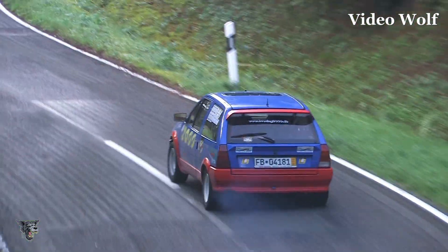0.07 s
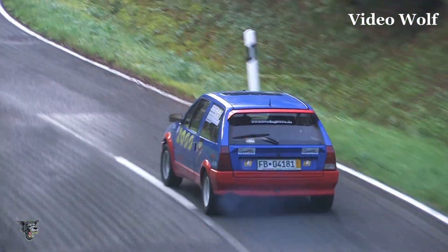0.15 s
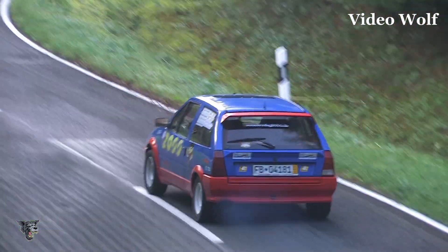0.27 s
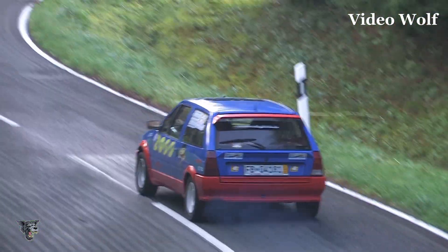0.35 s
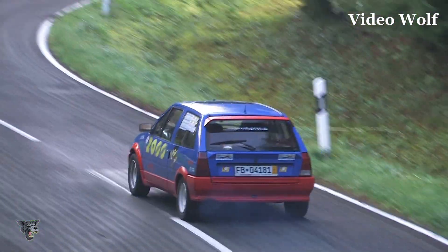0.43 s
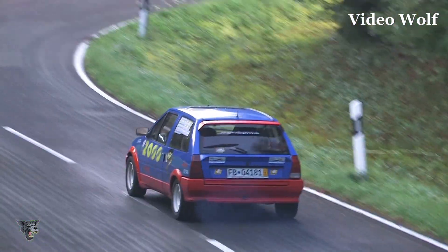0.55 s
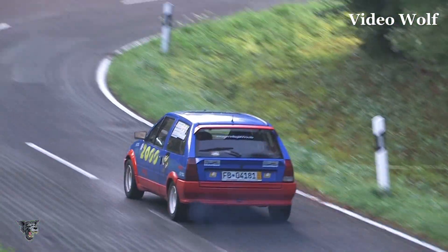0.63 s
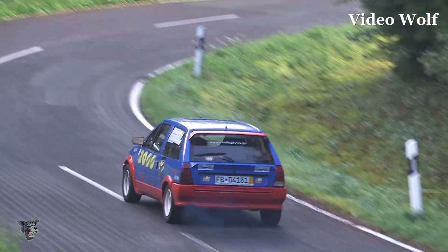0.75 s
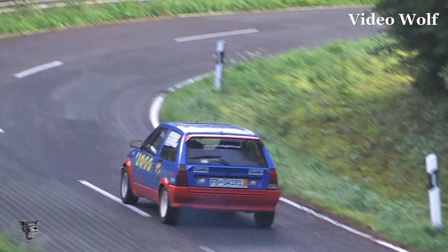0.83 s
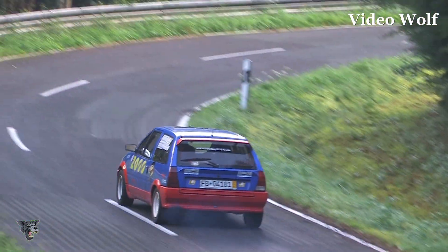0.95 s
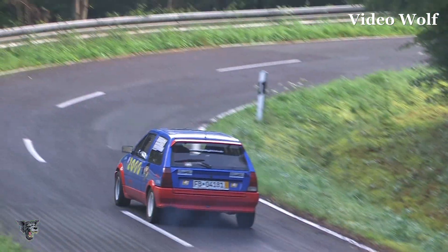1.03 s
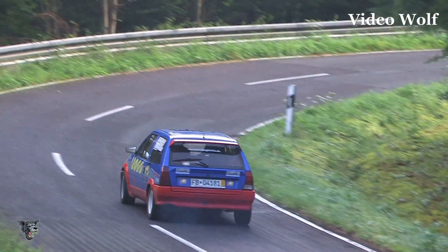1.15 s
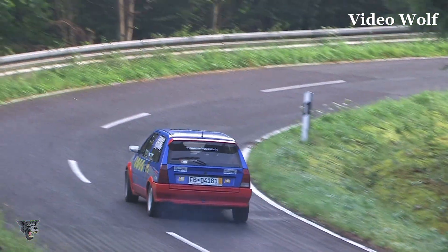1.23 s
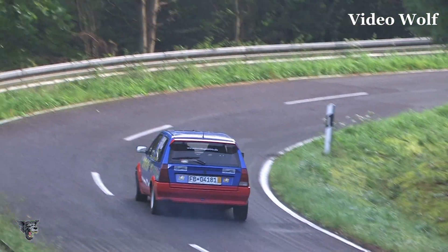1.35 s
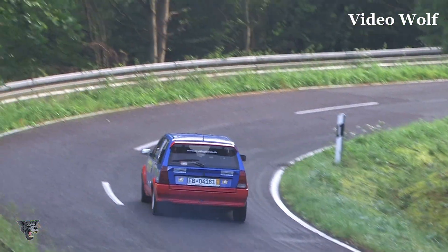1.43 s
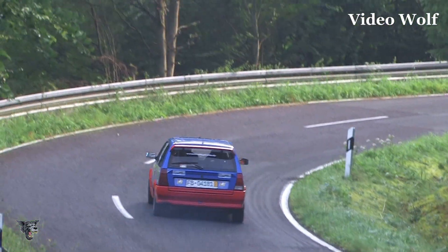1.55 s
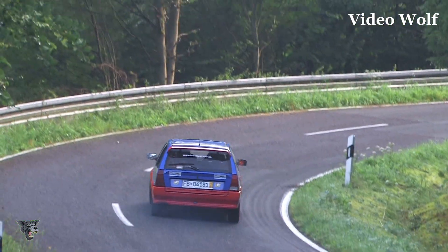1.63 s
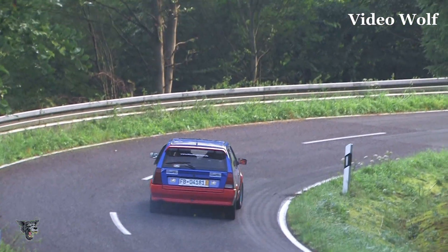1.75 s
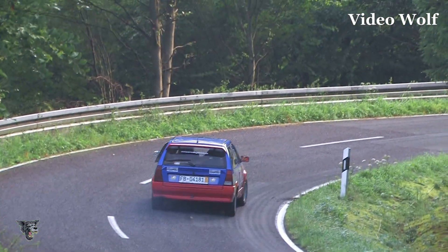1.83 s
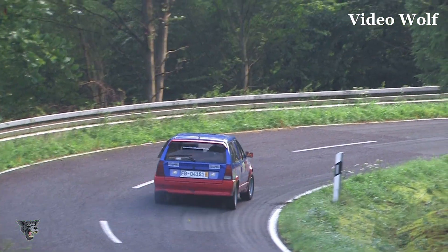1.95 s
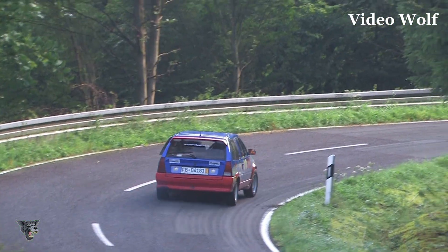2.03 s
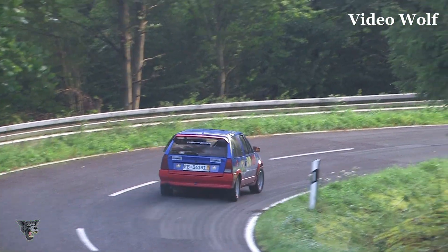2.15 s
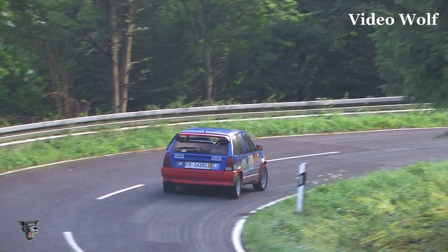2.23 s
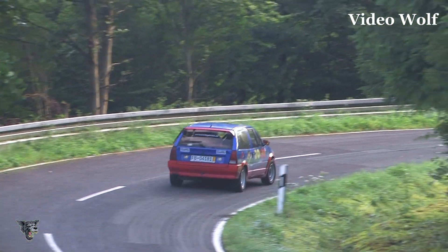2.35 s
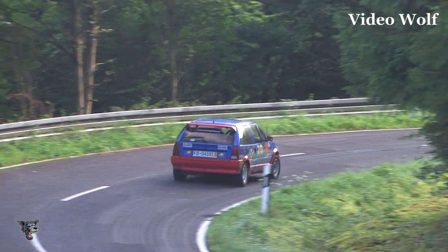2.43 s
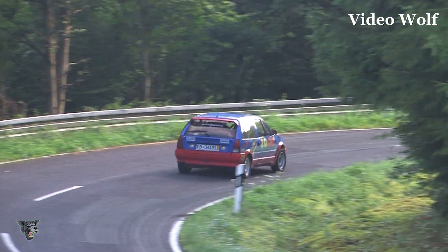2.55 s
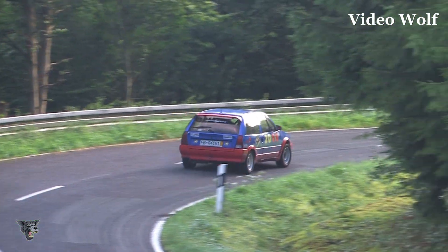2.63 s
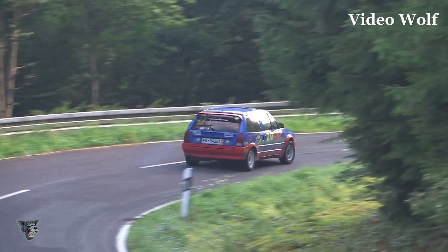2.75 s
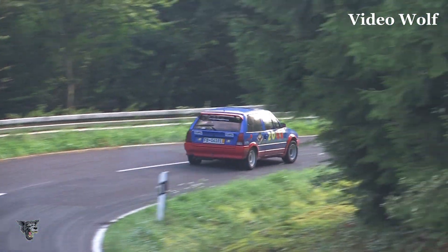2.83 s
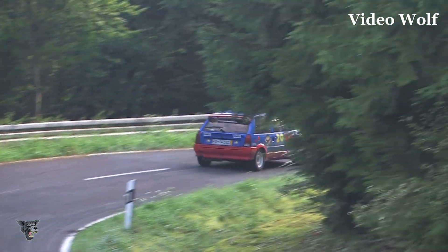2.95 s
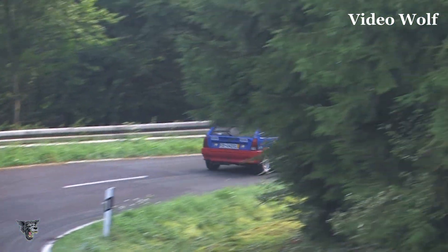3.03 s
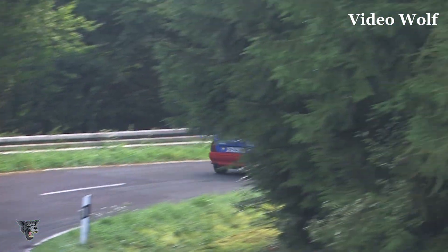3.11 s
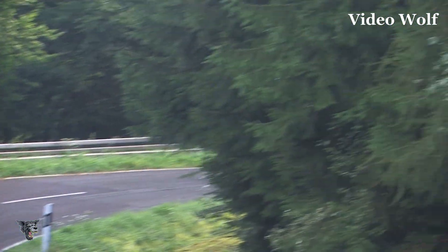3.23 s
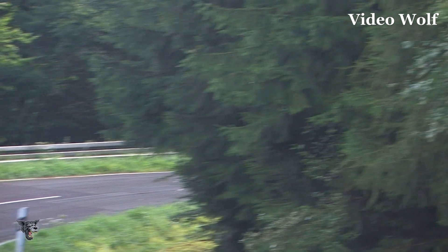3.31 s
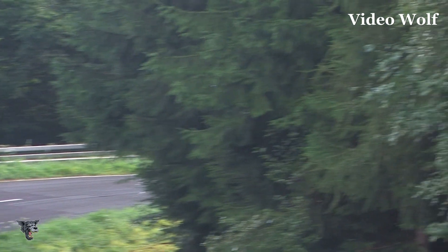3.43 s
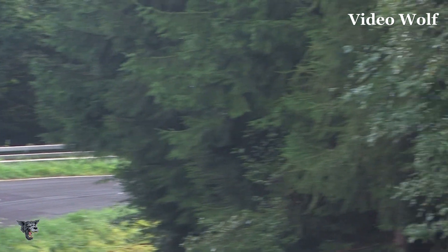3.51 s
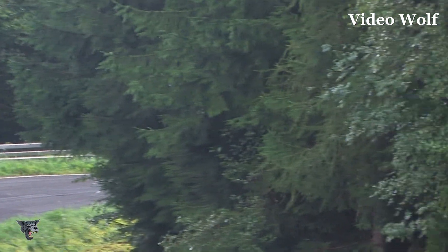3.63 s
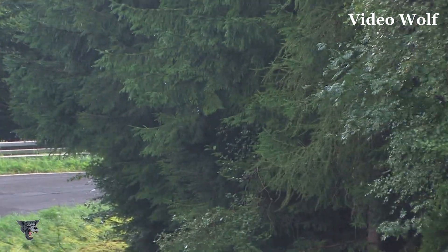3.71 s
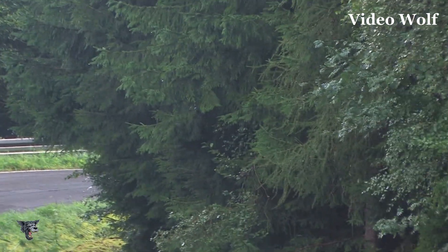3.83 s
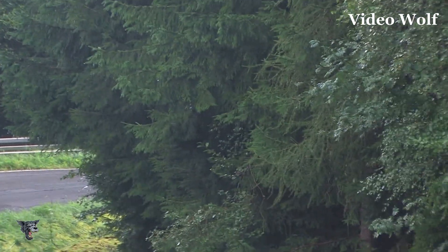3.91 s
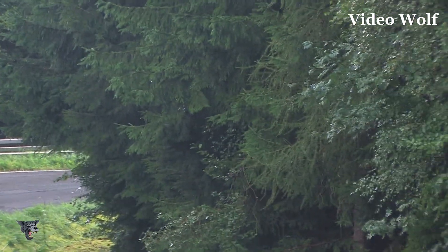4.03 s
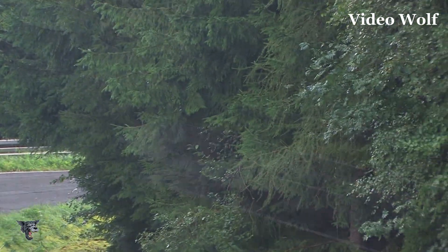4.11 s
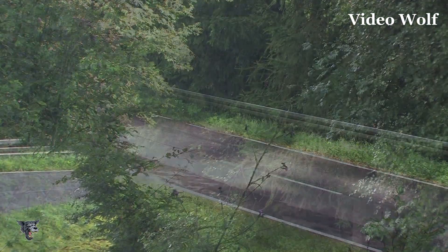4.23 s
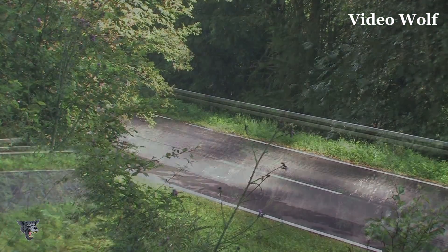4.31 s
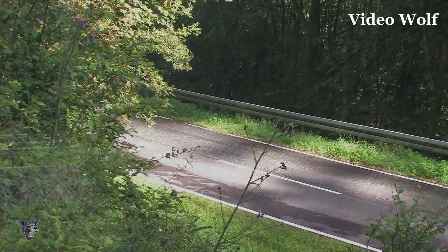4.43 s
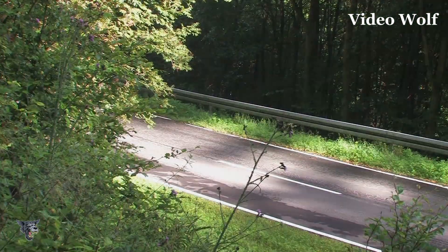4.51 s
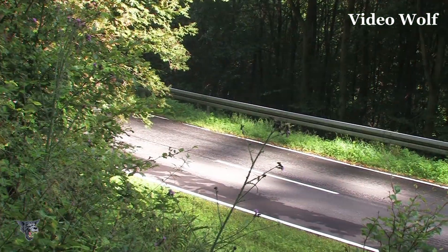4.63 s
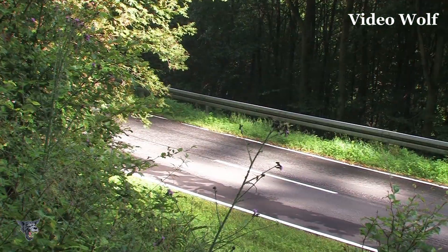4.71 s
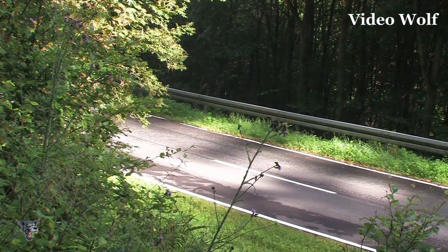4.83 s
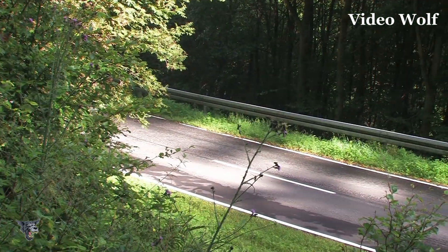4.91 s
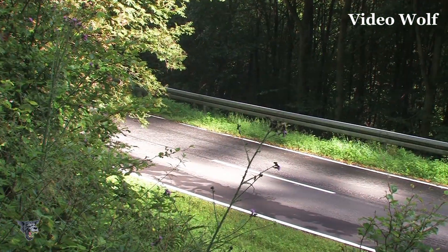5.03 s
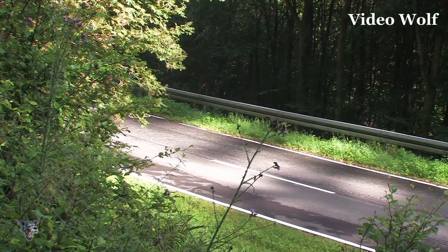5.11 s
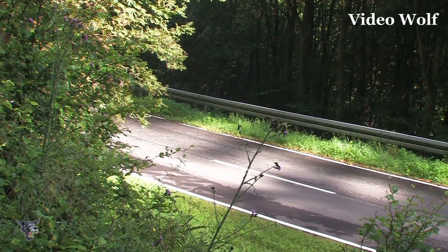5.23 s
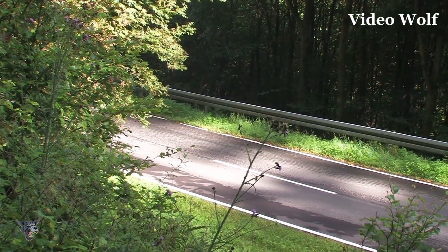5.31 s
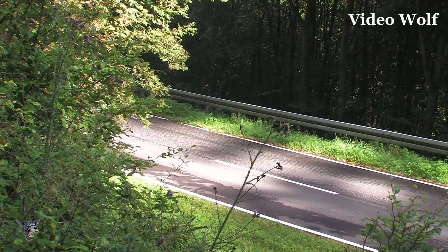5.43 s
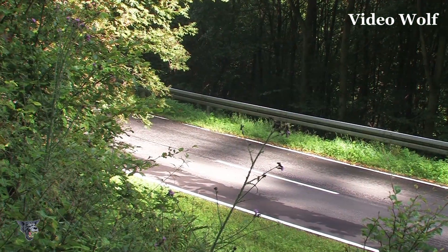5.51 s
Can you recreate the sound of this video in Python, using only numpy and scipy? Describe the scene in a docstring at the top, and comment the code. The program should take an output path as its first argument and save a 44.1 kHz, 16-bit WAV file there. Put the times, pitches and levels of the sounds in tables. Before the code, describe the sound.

A rasping race car accelerates away, shifts up and recedes behind trees before a second, far-off car corners with a short tyre squeal.

```python
"""A four-cylinder hillclimb car pulls away through a wooded bend, eases off, revs briefly and labours
on in a higher gear behind trees. Its firings make the exhaust pipe drone, bursts of gas make it rasp,
throttle changes thud, and grit flung by the tyres ticks on the body.
Then a second car, far off in the echoing forest, slows for a corner and a sliding tyre briefly squeals.
Faint traffic and trees murmur underneath."""
import sys
import numpy as np
from scipy import signal
from scipy.fft import rfft, irfft, next_fast_len
from scipy.io import wavfile
from scipy.ndimage import uniform_filter1d, map_coordinates

SR = 44100
rng = np.random.default_rng(int(sys.argv[2]) if len(sys.argv) > 2 else 0)


def store_pcm(level_fs):
    """Save levels as 16-bit WAV."""
    pcm = np.round(np.clip(level_fs, -1, 1) * 32767).astype(np.int16)
    wavfile.write(sys.argv[1], SR, np.atleast_2d(pcm).T)


N = 245195
TIME = np.arange(N) / SR

# Levels are relative. An "order" is a tone at a multiple of the engine's turning speed.
# near engine's speed: t/s, speed/(turns/s)
ENGINE_SPEED = [(0.0, 83.5), (0.24, 81.6), (0.39, 84.2), (0.49, 83.9), (1.23, 90.9), (1.7, 99.9),
                (1.78, 97.5), (2.12, 100.5), (2.25, 104.4), (2.38, 103.4), (2.45, 106.9), (2.49, 103.4),
                (2.78, 86.9), (2.9, 99.5), (3.11, 77.6), (3.46, 70.7), (4.45, 70.7)]
# rocking after the clutch bites: start/s, end/s, f/Hz, swing/(turns/s)
CLUTCH_ROCKING = (3.06, 4.06, 5, 1.28)
# throttle presses (pull, quick rev, next gear): down/s, up/s, opening from 0 to 1
PEDAL_PRESSES = [(-.1, 2.39, 0.99), (2.82, 3.4, 0.42), (3.08, 5, 0.77)]
# firing note, two firings a turn: t/s, level/dB
FIRING_LEVEL = [(0.0, -17.5), (0.1, -18), (0.43, -19.5), (0.53, -18.5), (1.05, -25.5), (1.32, -21.5),
                (2.26, -22.5), (2.54, -26), (2.64, -32), (2.76, -28), (2.82, -35), (3.18, -27), (3.42, -31),
                (3.77, -27.5), (4.4, -42.5), (4.5, -52)]
# strength of the exhaust above the firing note: t/s, level/dB
EXHAUST_LEVEL = [(0, 1.5), (.75, -1.1), (1.05, 1.3), (1.3, -2), (1.9, -4), (2.36, 0.5), (2.65, -4),
                 (2.84, -6), (3.15, -13.5), (3.65, -11), (4.1, -17), (4.42, -22)]
# the near engine's tone dies away: t/s, level/dB
ENGINE_FADE = [(4.45, 0), (4.65, -40)]
# main tones of the pipe: order, level on throttle/dB, level coasting/dB
PIPE_ORDERS = [(4.0, -28, -29.5), (5.0, -39, -28.5), (6.0, -34.5, -41), (7.0, -43, -50.5),
               (8.0, -38.5, -43)]
# pitches the pipe boosts or weakens: f/Hz, half width/Hz, gain/dB
PIPE_RESONANCES = [(366.7, 32.2, -20), (446.6, 7.8, -10.5), (472.3, 11.7, 3), (559.6, 56.4, 13),
                   (678.7, 9.7, 9), (734, 47, -12.5)]
# overtones, with unequal cylinders filling the gaps between firing multiples: order, level/dB
OVERTONE_ORDERS = [(1, -12), (1.5, -12), (2.5, -6.5), (3, 0.5), (3.5, -15), (4.5, -13.5), (5.5, -12.5),
                   (6.5, -9.5), (9, -6.5), (10, -6), (11, -4), (12, -13), (13, -5.5), (14, -18), (15, -8.5),
                   (16, -14), (17, -11), (18, -21), (19, -11), (21, -12.5)]
# how the silencer colours the overtones: f/Hz, gain/dB
SILENCER_COLOUR = [(72, -7), (84, 2), (105, -3), (250, -2), (300, 2), (350, -3), (560, 4), (720, -5),
                   (980, 2), (1250, -4), (1550, 1), (1750, -6), (2500, -4)]
# narrow ring of the silencer: f/Hz, half width/Hz, gain/dB
SILENCER_RING = (1530, 27, 8.6)
# low roar of the gas: f/Hz, level/dB
ROAR_COLOUR = [(30, -32), (60, -18), (120, -14), (250, 4), (380, -10.5), (560, 8.5), (740, -8.5),
               (1000, 3.5), (1250, -3.5), (1600, -3), (2500, -46.5)]
# brighter rasp: f/Hz, level/dB
RASP_COLOUR = [(900, -30), (1400, -7.5), (1550, -6.5), (1780, -6.5), (2100, -5), (2620, -12), (2900, -11.5),
               (3260, -14.5), (3900, -14), (4650, -22.5), (5500, -38), (8000, -84)]
# high hiss: f/Hz, level/dB
HISS_COLOUR = [(3500, -17), (4700, -6), (5500, -9.5), (6600, -5), (7500, -8.5), (8600, -11), (10000, -20.5),
               (11300, -30), (12500, -61.5), (13500, -56.5)]
# rasp and hiss, which the trees screen in the end: t/s, level/dB
TREBLE_LEVEL = [(0, 1), (.8, -2), (1.5, -5), (2.2, -5.5), (2.37, -2.7), (3.1, -1), (3.38, -6.5), (3.77, -9),
                (3.95, -13.5), (4.3, -16.5)]
# thuds at throttle changes: t/s, level/dB
THROTTLE_THUDS = [(2.465, -40), (2.79, -36), (4.77, -40)]
# grit hitting the body: t/s, level/dB
GRIT_HITS = [(2.335, -32.5), (2.366, -33), (2.5047, -33), (2.959, -34), (3.04, -28.5), (3.0944, -26),
             (3.335, -39.5)]
# sound of grit on the body: f/Hz, level/dB
GRIT_COLOUR = [(800, -20), (2200, 0), (4500, -8), (7000, -22), (13000, -32)]
# a stone glances off metal: t/s, f/Hz, level/dB
STONE_PING = (2.425, 5150, -47)
# far engine: t/s, speed/(turns/s), level/dB
FAR_ENGINE = [(4.15, 73, -64), (4.38, 74, -46.5), (4.6, 76, -38), (4.8, 73, -40), (4.95, 66.6, -42),
              (5.12, 72, -39.5), (5.25, 62.5, -44), (5.34, 63, -36), (5.48, 55.6, -35)]
# far engine's tones: order, level/dB
FAR_ENGINE_ORDERS = [(1, -11.5), (2, -3), (3.5, -6.5), (4, -3), (7, -3.5), (8, 0), (9, -6.5), (11, -3),
                     (12, 1.5), (14, -5.5), (16, 0.5), (17, -11), (18, -8), (20, 0.5), (21, -21),
                     (24, -4.5)]
# how the far exhaust colours them: f/Hz, gain/dB
FAR_PIPE_COLOUR = [(220, -4), (290, 1), (440, -5), (640, 3), (760, -1), (880, 0), (930, -5), (1300, -3)]
# sliding tyre: t/s, f/Hz, level/dB
TYRE_SQUEAL = [(4.8, 1800, -67.5), (4.98, 1693, -38), (5.09, 1812, -43), (5.22, 1714, -43),
               (5.29, 1710, -51), (5.42, 1540, -66)]
# far car's rushing noise: t/s, roar level/dB, tyre level/dB
FAR_RUSH_LEVELS = [(4.35, -45, -47), (4.68, -36.5, -39.5), (4.95, -40, -40), (5.25, -33.5, -38.5),
                   (5.56, -35.5, -40)]
# far exhaust's roar: f/Hz, level/dB
FAR_ROAR_COLOUR = [(25, -27), (45, -6), (110, 0), (180, -12), (230, -4.5), (280, 8.5), (350, -7.5),
                   (440, -2), (560, 1), (800, 4), (1000, -1.5), (1300, -1.5), (2000, -54)]
# far tyres rolling: f/Hz, level/dB
FAR_TYRE_COLOUR = [(800, -35), (1300, -3.5), (1700, 0.5), (2100, -5), (2700, -11.5), (3800, -16),
                   (4800, -27), (5500, -34), (6600, -30.5), (8500, -38.5), (10000, -46), (13500, -56)]
# how long the forest echoes: f/Hz, time to fall by 60 dB/s
ECHO_TIMES = [(150, 1), (1000, 0.93), (4000, 0.13), (10000, 0.05)]
# distant traffic and trees: f/Hz, level/dB
BACKGROUND_COLOUR = [(20, -20.5), (40, -4), (75, -5.5), (110, -10), (200, -29.5), (600, -14.5), (2000, -26),
                     (4500, -33.5), (9000, -49)]
# how alike a noise is on the left and right: f/Hz, likeness (1 = the same)
STEREO_LIKENESS = [(100, 1), (600, 0.96), (1200, 0.92), (2500, 0.91), (5000, 0.77), (10000, 0.88)]

OPEN_S, CLOSE_S = 0.032, .09  # time the throttle takes to open and to close
FALTER_DB, FALTER_S = -10, 0.035  # the pipe tone dips as the throttle snaps shut
MID_SPEED = 93  # turns/s; the per-octave changes count from here
# For each layer: a base level and the change when coasting (foot off the pedal).
OVERTONE_DB, OVERTONE_COAST_DB, OVERTONE_DB_PER_OCTAVE = -31, -8.5, -6.5
ROAR_DB, ROAR_COAST_DB, ROAR_SHARE = -32, -2.5, 0.63  # the roar partly follows the exhaust's level
RASP_DB, RASP_COAST_DB, RASP_DB_PER_OCTAVE = -33, -3, 10
HISS_DB, HISS_SWING = -49.5, 1.25  # the hiss swings a little wider than the rasp
FADE_IN_S, TOP_HZ = .005, 13600


def exhaust_tone(angle):
    """The near engine's firings make a low note, with higher tones shaped by pipe and silencer."""
    speed, coast = engine_speed(), coasting()
    note = amp(curves(FIRING_LEVEL)[0]) * order_tone(angle, order=2, waver_db=0)
    # With the foot off, uneven firing blurs the tones (amounts in radians).
    blurred = angle + .04 * coast * wobble(70)
    pipe = 0
    for order, on_db, off_db in PIPE_ORDERS:
        level_db = on_db + (off_db - on_db) * coast + resonance_db(order * speed, PIPE_RESONANCES)
        pipe += amp(level_db) * order_tone(blurred, order, waver_db=0.13)
    stumbling = angle + np.interp(TIME, [2.35, 2.5], [.035, .11]) * wobble(70)
    overtones = 0
    for order, db in OVERTONE_ORDERS:
        ring_db = resonance_db(order * speed, [SILENCER_RING])
        overtones += amp(db + ring_db) * order_tone(stumbling, order, waver_db=0.5)
    overtones = coloured(overtones, SILENCER_COLOUR)
    octaves = np.log2(speed / MID_SPEED)
    overtone_db = OVERTONE_DB + OVERTONE_COAST_DB * coast + OVERTONE_DB_PER_OCTAVE * octaves
    shut_s = THROTTLE_THUDS[0][0]
    falter_db = FALTER_DB * np.exp(-((TIME - shut_s) / FALTER_S) ** 2)
    upper = amp(curves(EXHAUST_LEVEL)[0] + falter_db) * (pipe + amp(overtone_db) * overtones)
    burn = wobble(170)  # no two firings are equally strong
    return amp(curves(ENGINE_FADE)[0]) * (note * (1 + 0.034 * burn) + upper * (1 + 0.055 * burn))


def engine_speed():
    """Turns a second of the near engine, rocking for a moment in the new gear."""
    start, end, hz, swing = CLUTCH_ROCKING
    rocking = swing * np.sin(2 * np.pi * hz * (TIME - start)) * (TIME > start) * (TIME < end)
    return curves(ENGINE_SPEED)[0] - rocking


def coasting():
    """1 with the foot off, about 0 at full throttle; overlapping presses add up."""
    return 1 - sum(opening * np.clip(np.minimum((TIME - down) / OPEN_S, 1 + (up - TIME) / CLOSE_S), 0, 1)
                   for down, up, opening in PEDAL_PRESSES)


def gas_rush(angle):
    """Gas bursts out at each firing, unevenly by cylinder, so its roar, rasp and hiss pulse."""
    exhaust_db, treble_db, coast = curves(EXHAUST_LEVEL)[0], curves(TREBLE_LEVEL)[0], coasting()
    octaves = np.log2(engine_speed() / MID_SPEED)
    flow_db = treble_db + RASP_COAST_DB * coast + RASP_DB_PER_OCTAVE * octaves
    bursts = 0.14 * np.cos(2 * angle) + 0.031 * np.cos(angle) + 0.036 * np.cos(angle / 2)
    depth = np.interp(TIME, [2.4, 4.4], [1, .3])  # distance smears the bursts
    pulse = unit(1 + depth * bursts)
    roar = amp(ROAR_DB + ROAR_COAST_DB * coast + ROAR_SHARE * exhaust_db) * noise(ROAR_COLOUR, 0)
    rasp = amp(RASP_DB + flow_db) * noise(RASP_COLOUR, flicker_db=1.0)
    hiss = amp(HISS_DB + HISS_SWING * flow_db) * noise(HISS_COLOUR, flicker_db=1.7)
    return pulse * (roar + rasp) + np.sqrt(np.abs(pulse)) * hiss


def throttle_thuds():
    """The exhaust gives a low thud as the throttle changes."""
    return sum(amp(db) * decay(start, 0.098) * np.sin(2 * np.pi * 66 * (TIME - start))
               for start, db in THROTTLE_THUDS)


def flung_grit():
    """Grit off the tyres ticks on the body, and one stone pings off metal."""
    grit = coloured(rng.standard_normal(N), GRIT_COLOUR)
    ticks = grit * sum(amp(db - 6.5) * decay(start, .016) for start, db in GRIT_HITS)
    start, hz, db = STONE_PING
    ping = amp(db) * decay(start, .1) * np.sin(2 * np.pi * hz * (TIME - start))
    return ticks + ping


def far_car():
    """An engine slows for a corner and a sliding tyre squeals, both blurred by the forest."""
    speed, engine_db = curves(FAR_ENGINE)
    angle = running_angle(speed, drift=0.00318, jitter=0.0048)
    tones = sum(amp(db) * order_tone(angle, order, waver_db=5.5) for order, db in FAR_ENGINE_ORDERS)
    engine = amp(engine_db - 2) * coloured(tones, FAR_PIPE_COLOUR)
    squeal_hz, squeal_db = curves(TYRE_SQUEAL)
    slip = running_angle(squeal_hz, drift=.004, jitter=.006)
    squeal = amp(squeal_db - 3) * order_tone(slip, order=1, waver_db=-0.5)
    direct = engine + squeal
    return direct + .5 * forest_echo(direct)


def far_rush():
    """The far car's exhaust roars and its tyres roll on the asphalt."""
    roar_db, tyres_db = curves(FAR_RUSH_LEVELS)
    roar = amp(roar_db) * noise(FAR_ROAR_COLOUR, flicker_db=2.5)
    tyres = amp(tyres_db) * noise(FAR_TYRE_COLOUR, flicker_db=2.0)
    return roar + tyres


def forest_echo(sound):
    """Tree trunks throw the sound back in stereo; the high pitches die first."""
    hz, t, spectrum = signal.stft(rng.standard_normal((2, SR)), SR, nperseg=256)
    dying = amp(-60 * t / at_pitch(ECHO_TIMES, hz)[:, None])
    mid, side = signal.istft(spectrum * dying, SR, nperseg=256)[1]
    tail = np.array([mid + 0.091 * side, mid - 0.28 * side]) / np.linalg.norm(mid)
    return signal.fftconvolve(sound[None], tail, axes=1)[:, :N]


def background():
    """Distant traffic and trees make a faint, uneven murmur."""
    return amp(-60) * noise(BACKGROUND_COLOUR, flicker_db=5.0)


def running_angle(speed, drift, jitter):
    """Angle in radians of a cycle whose speed drifts slowly and jitters quickly."""
    return 2 * np.pi * np.cumsum(speed * (1 + drift * wobble(16) + jitter * wobble(150))) / SR


def order_tone(angle, order, waver_db):
    """One tone, wavering in level as reflections from the ground and banks shift."""
    tone = np.sqrt(2) * np.sin(order * angle + rng.uniform(0, 2 * np.pi))
    return tone * unit(amp(waver_db * wobble(6.02)))


def resonance_db(hz, resonances):
    """How much a set of peaks and dips boosts or weakens a pitch."""
    return sum(db * np.exp(-((hz - centre) / width) ** 2) for centre, width, db in resonances)


def noise(colour, flicker_db):
    """Stereo noise of strength 1, flickering in random patches of pitch and time."""
    spectrum = signal.stft(rng.standard_normal((2, N)), nperseg=1024)[2]
    patches = uniform_filter1d(rng.standard_normal(spectrum.shape[1:]), size=5, axis=0)
    patches = uniform_filter1d(patches, size=10, axis=1)
    pair = signal.istft(spectrum * amp(flicker_db * unit(patches)), nperseg=1024)[1][:, :N]

    def mid_side_gains(hz):
        spread = np.arccos(np.clip(at_pitch(STEREO_LIKENESS, hz), -1, 1)) / 2
        return amp(at_pitch(colour, hz)) * [np.cos(spread), np.sin(spread)]

    mid, side = filtered(pair, mid_side_gains)
    return unit(np.array([mid + side, mid - side]))


def wobble(rate):
    """A smooth curve through `rate` random points a second."""
    points = rng.standard_normal(int(N * rate / SR) + 4)
    coarse = np.arange(0, N + 32, 32)
    return np.interp(np.arange(N), coarse, map_coordinates(points, [coarse * rate / SR]))


def decay(start, fall_s):
    """Jumps to 1 at the start, then falls by 60 dB every fall_s seconds."""
    return (TIME >= start) * amp(-60 * np.abs(TIME - start) / fall_s)


def coloured(sound, colour):
    """The sound shaped by a table of f/Hz, gain/dB, then set to strength 1."""
    return unit(filtered(sound, lambda hz: amp(at_pitch(colour, hz))))


def filtered(sound, gain):
    """Turns each frequency up or down by gain(hz)."""
    size = next_fast_len(N + SR // 2)
    return irfft(rfft(sound, size) * gain(np.fft.rfftfreq(size, 1 / SR)), size)[..., :N]


def curves(rows):
    """One value per sample for each column after the time."""
    times, *columns = np.transpose(rows)
    return [np.interp(TIME, times, column) for column in columns]


def at_pitch(rows, hz):
    """Reads a table of f/Hz, value on a log frequency scale."""
    pitches, values = np.transpose(rows)
    return np.interp(np.log(hz + 1), np.log(pitches + 1), values)


def amp(db):
    """Decibels to gain."""
    return 10 ** (np.asarray(db) / 20)


def unit(x):
    """Scales to an average strength (rms) of 1."""
    return x / np.sqrt(np.mean(x ** 2) + 1e-20)


def scene():
    """Both cars in the forest; the near exhaust sits slightly right."""
    angle = running_angle(engine_speed(), drift=0.001974, jitter=0.0051)
    tone = exhaust_tone(angle)
    echo_gain = amp(np.interp(TIME, [2, 4.3], [-26, -19]))  # grows as the car drives into the trees
    near = (tone + echo_gain * forest_echo(tone)) * amp([[-.65], [.65]])
    handover = np.interp(TIME, [4.15, 4.4], [0, np.pi / 2])  # one car's rush gives way to the other's
    rush = np.cos(handover) * gas_rush(angle) + np.sin(handover) * far_rush()
    return near + rush + far_car() + throttle_thuds() + flung_grit() + background()


def record(dry):
    """Fades the sound in quickly and removes the very highest treble."""
    return filtered(dry * np.minimum(TIME / FADE_IN_S, 1), lambda hz: hz < TOP_HZ)


dry = scene()
out = record(dry)
store_pcm(out)
```